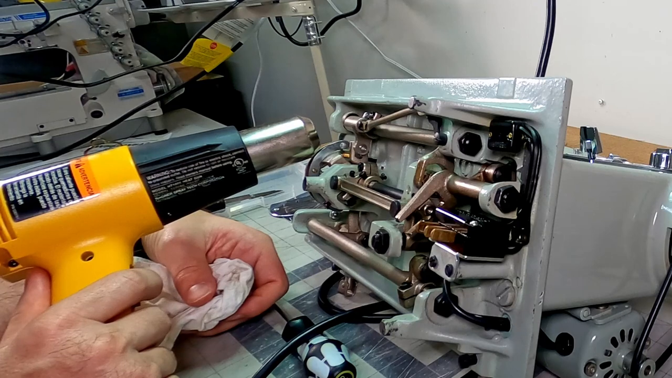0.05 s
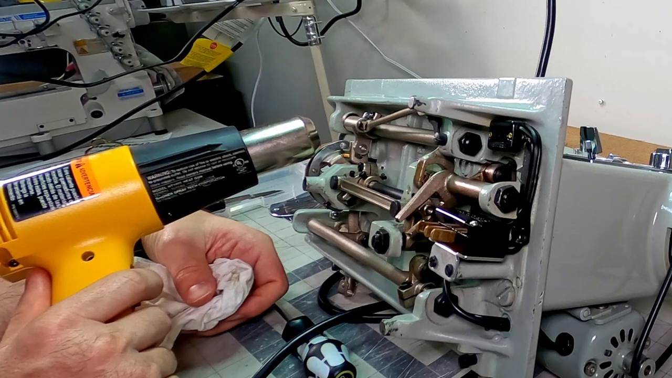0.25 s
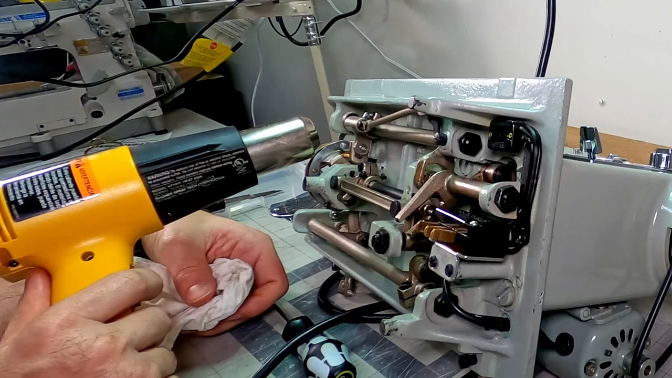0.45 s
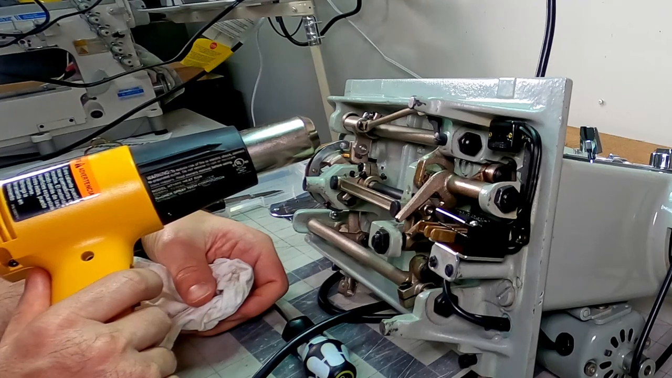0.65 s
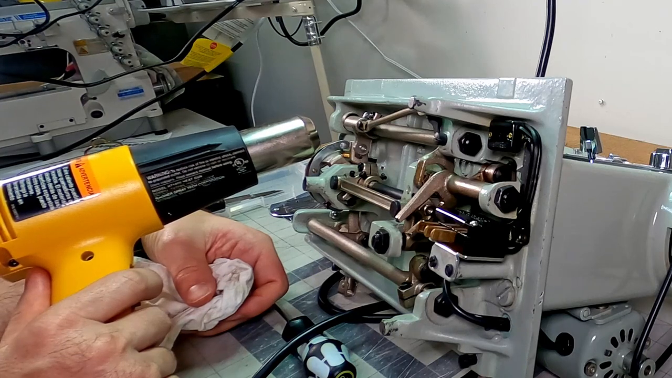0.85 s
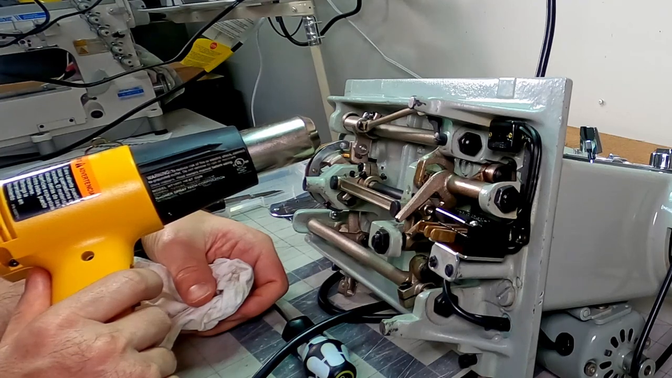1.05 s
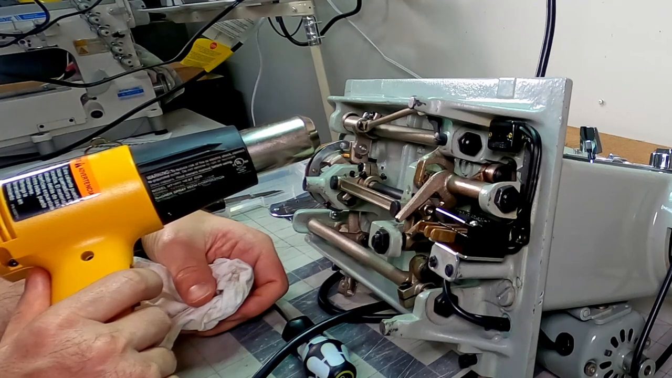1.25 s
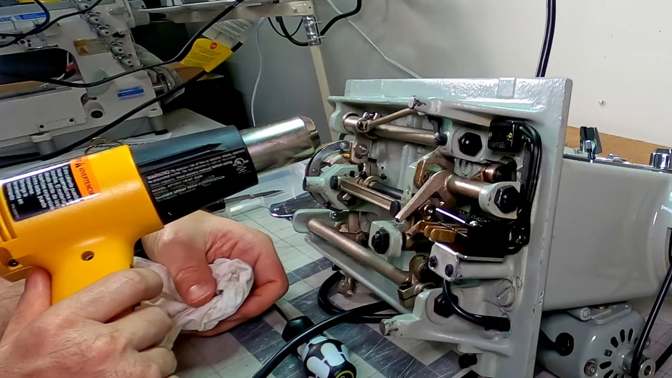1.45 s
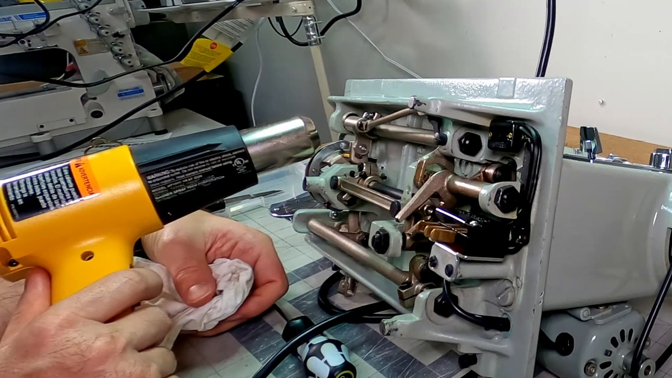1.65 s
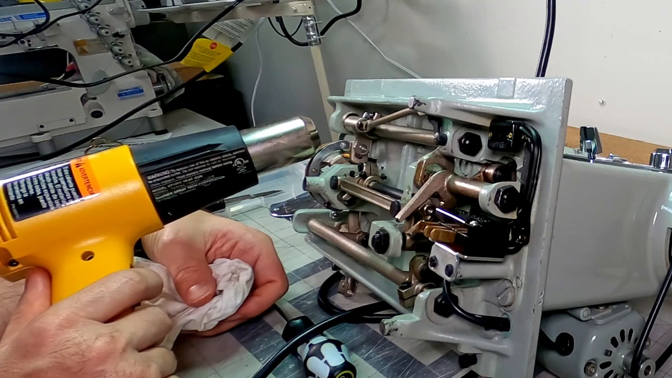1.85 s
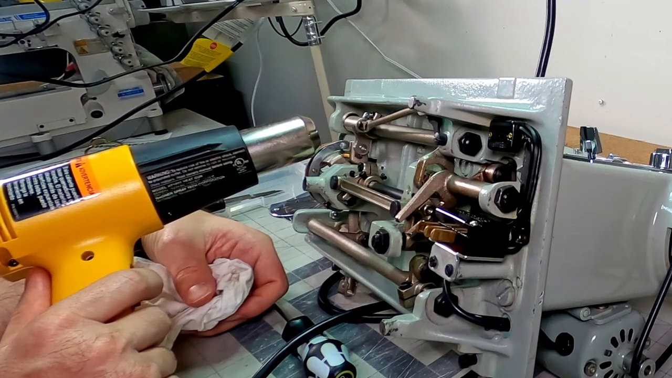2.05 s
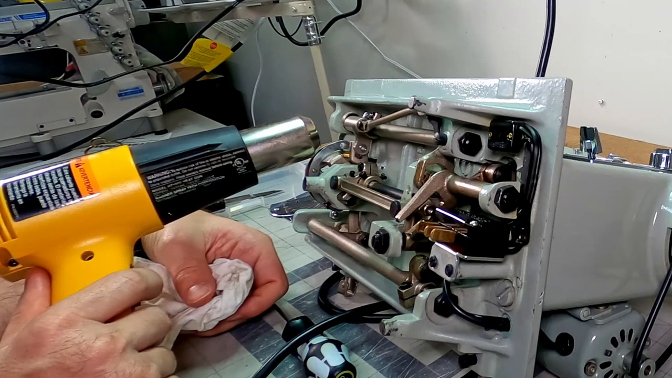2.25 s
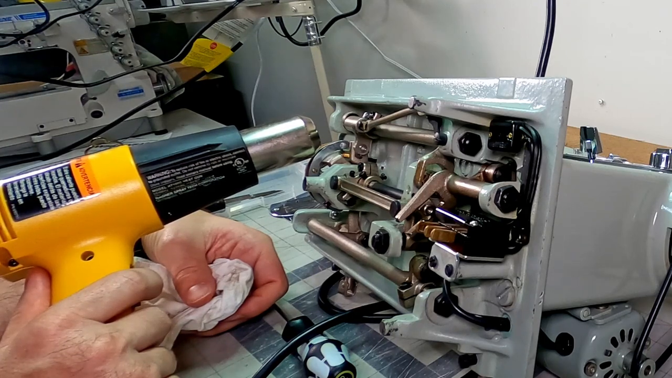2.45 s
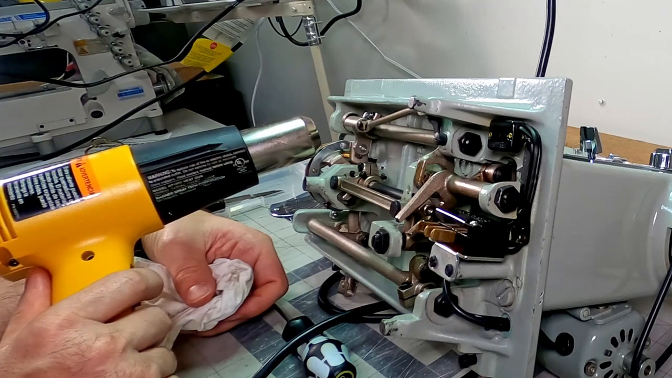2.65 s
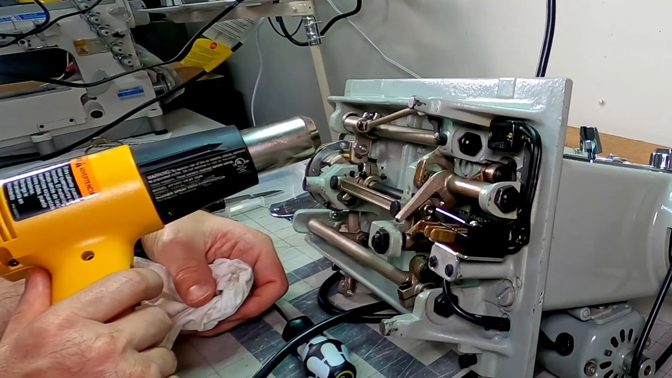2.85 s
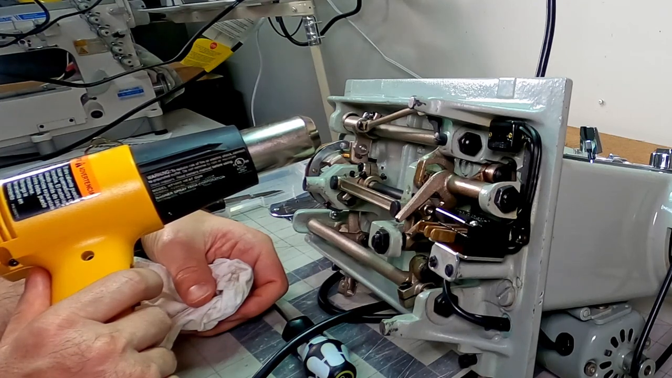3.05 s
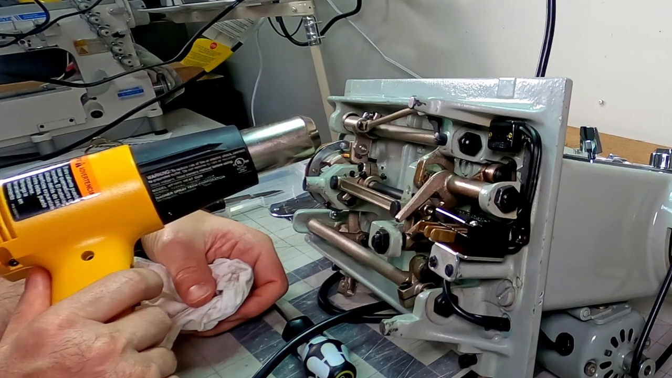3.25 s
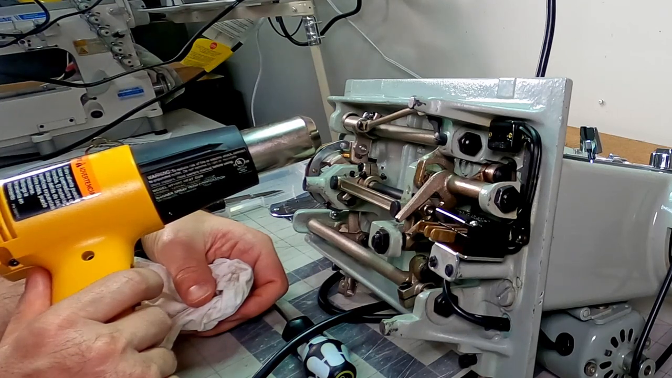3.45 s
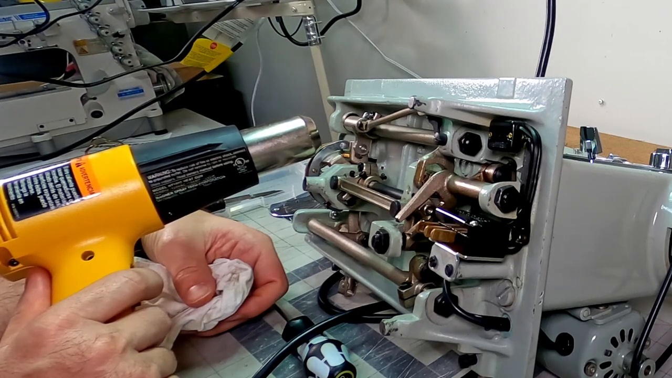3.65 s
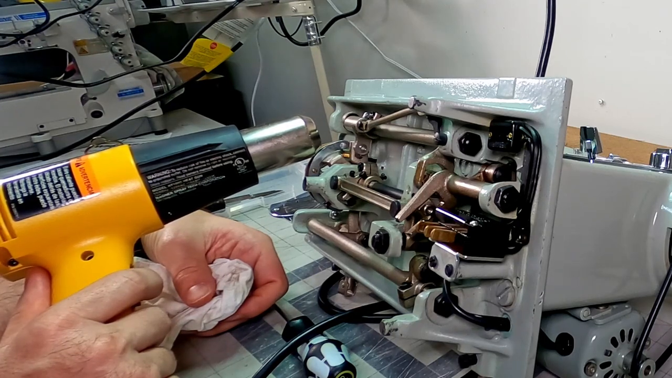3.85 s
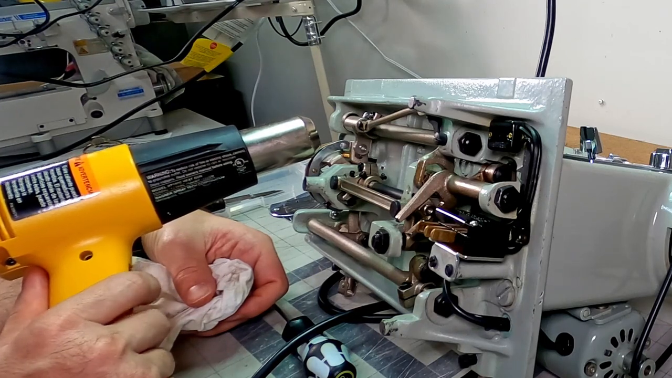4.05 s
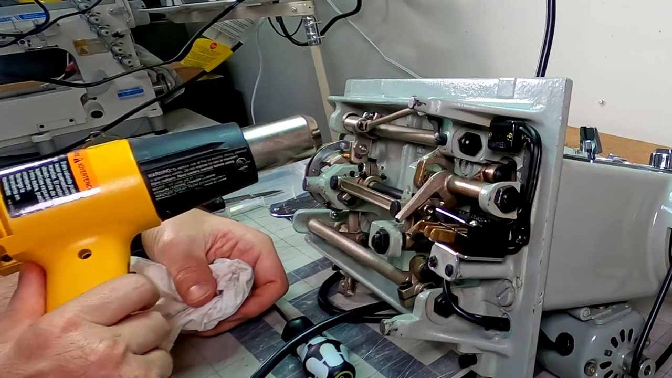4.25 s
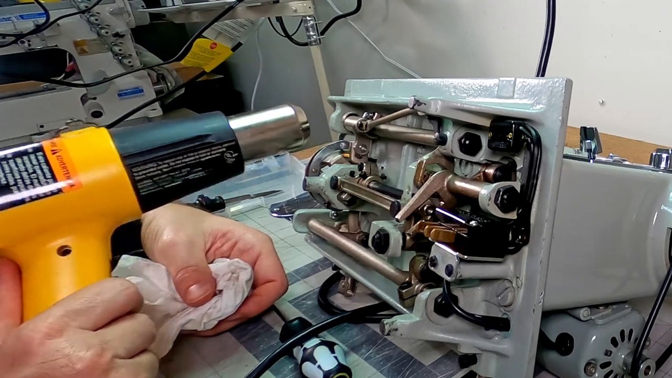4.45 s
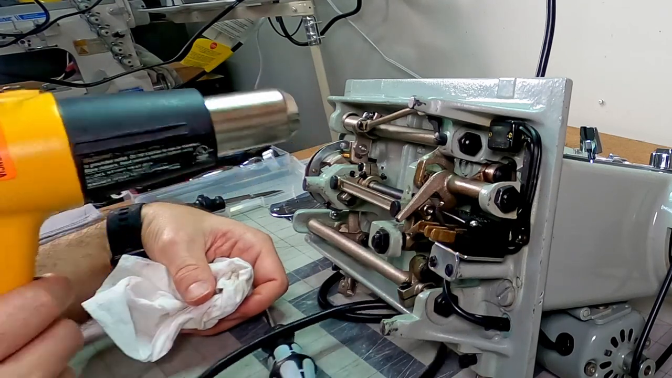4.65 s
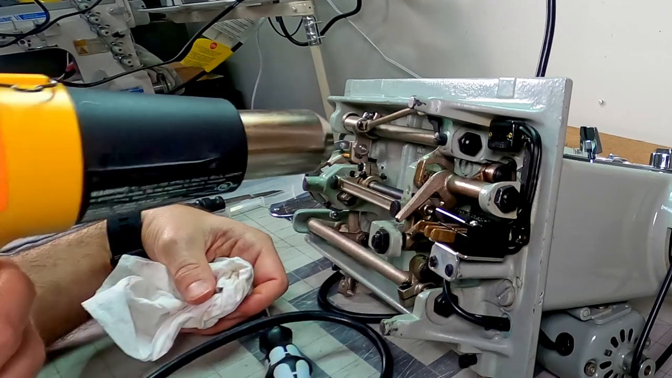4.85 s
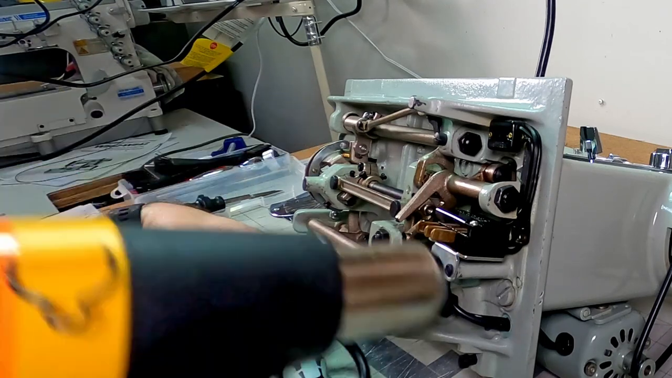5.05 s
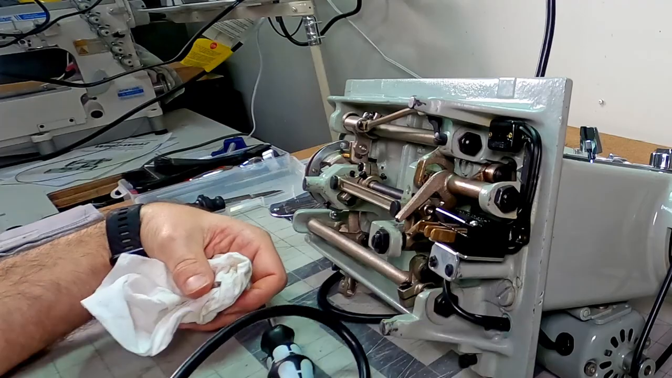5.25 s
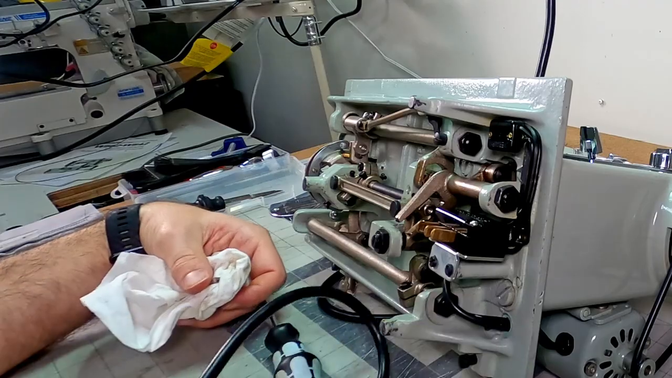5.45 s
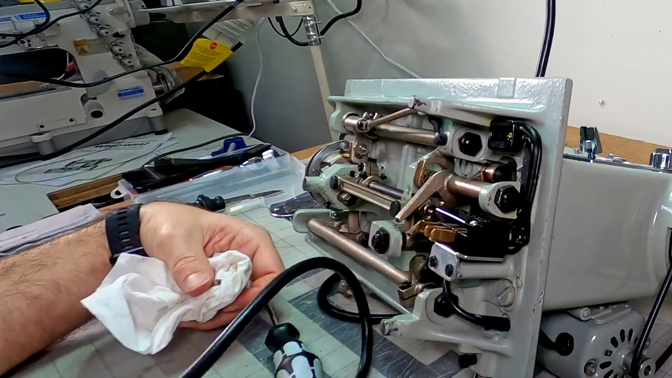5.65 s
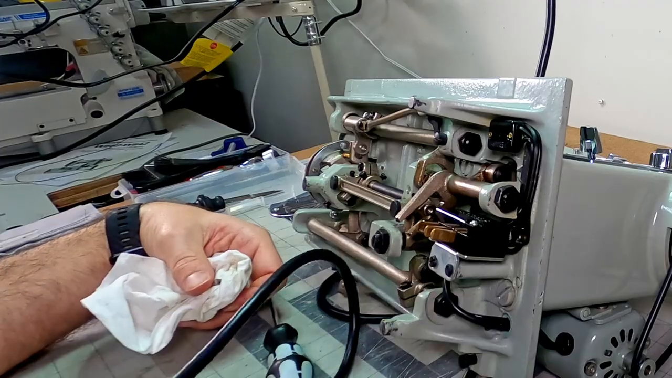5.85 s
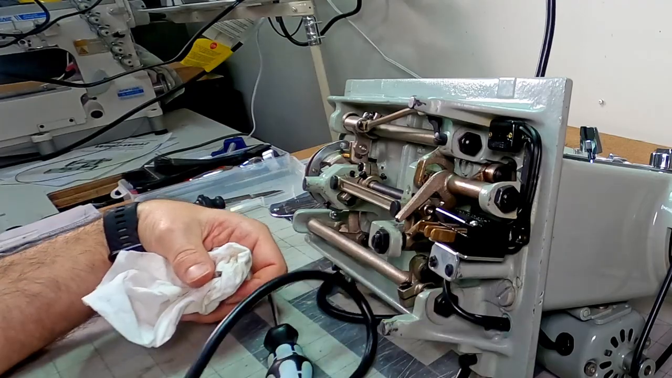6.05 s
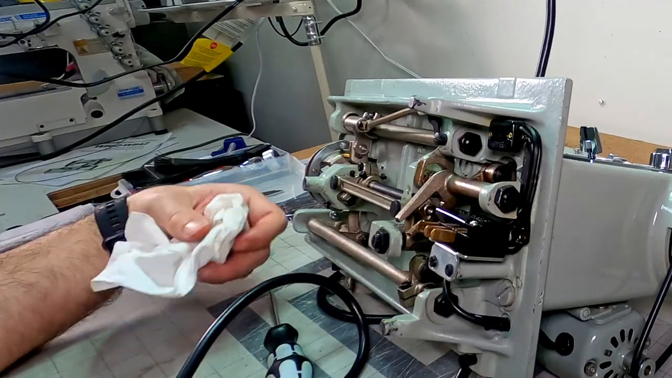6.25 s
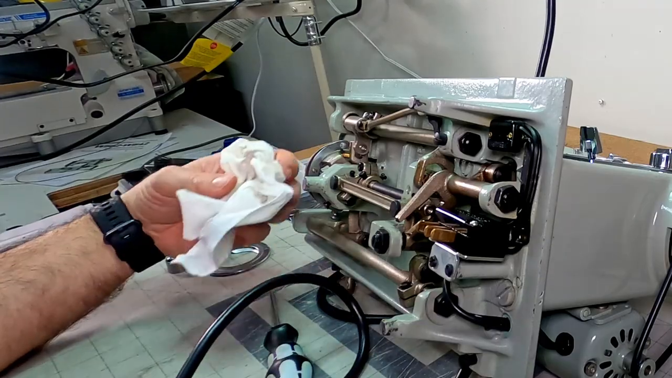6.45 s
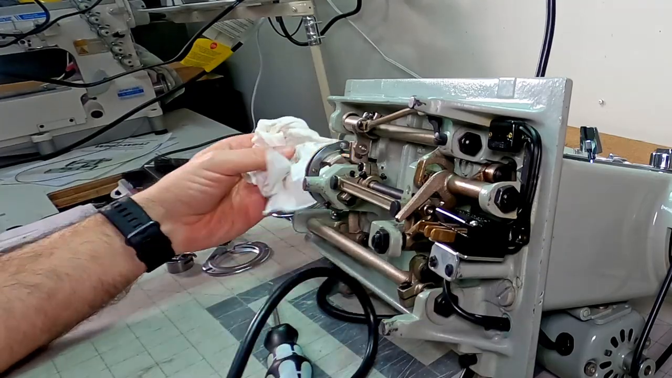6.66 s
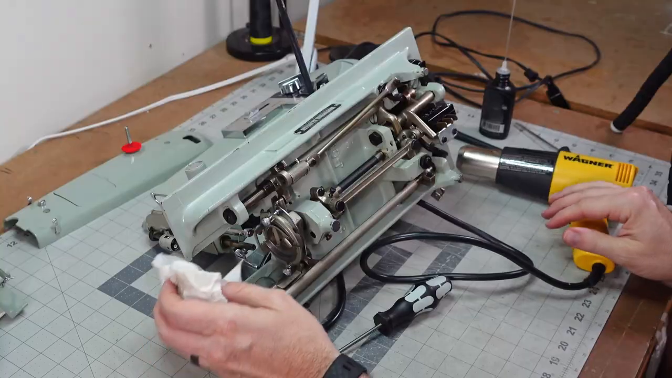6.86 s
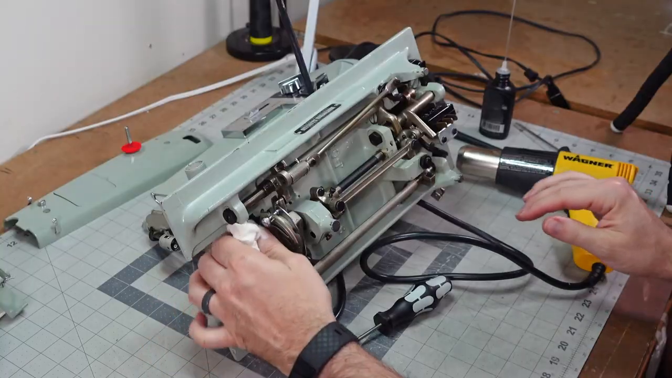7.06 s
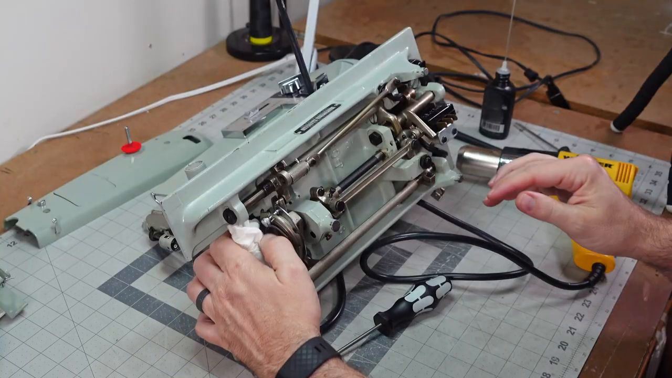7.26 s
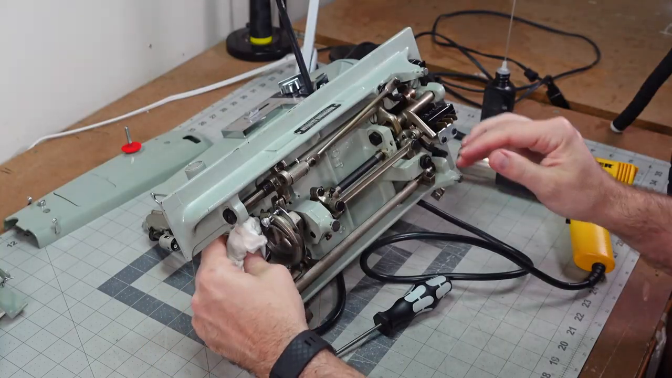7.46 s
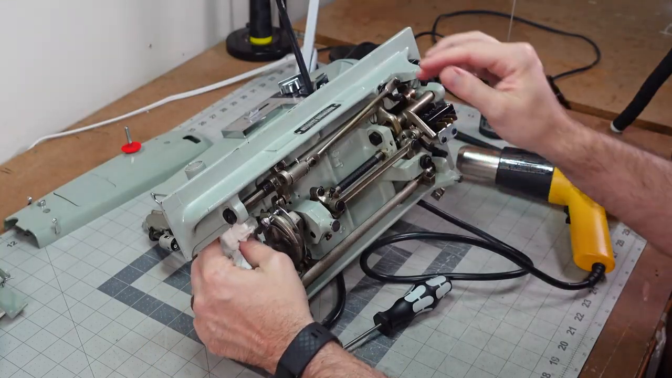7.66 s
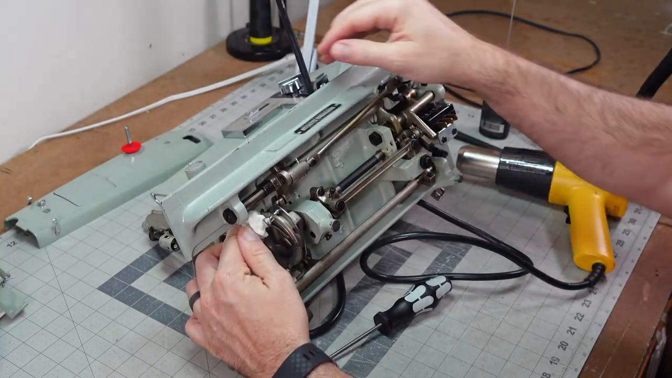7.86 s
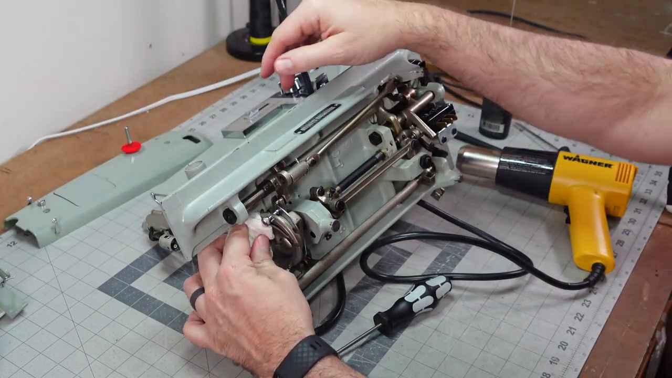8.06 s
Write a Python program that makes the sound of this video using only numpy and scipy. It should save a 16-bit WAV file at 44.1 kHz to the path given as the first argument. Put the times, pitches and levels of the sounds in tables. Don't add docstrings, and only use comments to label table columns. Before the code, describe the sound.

A constant, dense rush of air with an electric fan whine fills the first four seconds, heard close in a fairly dry room. The gun lifts, its pitch jumps and the roar swells, sharp switch clicks cut it and the sound droops away. Small rattles lead to a wooden thump and a harder clattering drop. Then it is quiet: low hum, cloth wiping oily metal, faint high squeaks, light ticks and a last tiny steel ping.

```python
import sys
import numpy as np
from scipy import signal
from scipy.fft import rfft, irfft, next_fast_len
from scipy.io import wavfile
from scipy.ndimage import uniform_filter1d, map_coordinates

SR = 44100
rng = np.random.default_rng(int(sys.argv[2]) if len(sys.argv) > 2 else 0)


def boost_factor(decibels):
    exponent = np.asarray(decibels, float) / 20
    return 10 ** exponent


def dump_mix(stems):
    frames = np.atleast_2d(stems).T
    limited = np.clip(frames, -1, 1)
    pcm = np.round(limited * 32767).astype(np.int16)
    wavfile.write(sys.argv[1], SR, pcm)


N = 358088
T = np.arange(N) / SR

# [f/Hz, density/dB]
HELD_COLOUR = [(300, -21.5), (480, -15.5), (580, -0.5), (850, 1), (1500, -12.5), (1900, -5.5), (2250, -16),
               (4600, -25), (6400, -25), (7300, -24), (9900, -35), (12200, -26.5), (13400, -37),
               (15700, -33)]
# [f/Hz, width/Hz, gain/dB]
BARREL_MODES = [(940.0, 60, -6.6), (1580.0, 60, -3.7), (2160.0, 60, -3.6), (2520.0, 100, 6.1),
                (3360.0, 60, -3.8), (3590.0, 100, -4.1), (3970.0, 160, 4.1), (4750.0, 60, -7.4),
                (4970.0, 60, -3.9), (5100.0, 100, -5.4), (5260.0, 60, 5.1), (6400.0, 100, -9.4),
                (6490.0, 60, -3.8), (6850.0, 100, 9.5), (6980.0, 60, 3.0), (7720.0, 60, 6.1),
                (8140.0, 60, -5.9), (8270.0, 60, 7.5), (8820.0, 100, 3.1), (9210.0, 250, 3.6),
                (9460.0, 60, 7.8), (9920.0, 100, -3.1), (10270.0, 100, 7.1), (11180.0, 160, -5.9),
                (11690.0, 100, 8.7), (12080.0, 60, -5.5), (14080.0, 160, 3.7), (15630.0, 100, 4.6)]
# [f/Hz, level/dB]
HOUSING_MODES = [(2727, -76), (2896, -75), (3133, -77), (3246, -76), (3957, -77), (4177, -78), (4578, -78),
                 (4700, -81), (5039, -81), (5499, -81), (5623, -79), (5908, -79), (8393, -83), (11348, -83),
                 (4522, -78), (4807, -80), (4861, -77), (5152, -80), (5222, -77), (5281, -75), (5685, -78),
                 (5792, -77), (6019, -79), (6164, -78), (6541, -79), (6713, -75), (6837, -69), (7009, -73),
                 (7197, -74), (7434, -78), (7472, -79), (7585, -78), (7720, -77), (8043, -80), (8280, -79),
                 (8640, -81), (9340, -83), (9442, -82), (10309, -84), (10659, -86), (11719, -78),
                 (12177, -82), (15638, -87)]
SHAFT_HZ = 173.92
HELD_DB = -42.5
SAG_S, SAG_TAKES_S, SAG = 4.97, .09, .27


def unit(x):
    return x / np.sqrt(np.mean(x ** 2) + 1e-20)


def peak(x):
    return x / np.abs(x).max()


def ramp(start_s, takes_s):
    return np.clip((T - start_s) / takes_s, 0, 1)


def along(points, hz):
    f, v = np.transpose(points)
    return np.interp(np.log(hz + 1), np.log(f + 1), v)


def curve(rows):
    s, v = np.transpose(rows)
    return np.interp(T, s, v)


def wobble(rate):
    return map_coordinates(rng.standard_normal(int(N * rate / SR) + 4), [np.arange(N) * rate / SR])


def filtered(x, response):
    m = next_fast_len(len(x) + 8192)
    return irfft(rfft(x, m) * response(np.fft.rfftfreq(m, 1 / SR)), m)[:len(x)]


def treble_of(x, corner_hz, order):
    return filtered(x, lambda hz: 1 / (1 + (corner_hz / (hz + 1)) ** order))


def resonance(f, hz, width):
    return 1j * f * width / (hz * hz - f * f + 1j * f * width)


def bumps(modes, hz):
    return sum(db * np.abs(resonance(hz, c, w)) ** 2 for c, w, db in modes)


def rush(colour_db, patchy_db, high=6, long=12):
    z = signal.stft(rng.standard_normal(N), nperseg=512)[2]
    field = uniform_filter1d(rng.standard_normal(z.shape), size=high, axis=0)
    field = uniform_filter1d(field, size=long, axis=1)
    noise = signal.istft(z * boost_factor(patchy_db * unit(field)), nperseg=512)[1][:N]
    return unit(filtered(noise, lambda hz: boost_factor(colour_db(hz))))


def breath(width_hz):
    return unit(filtered(rng.standard_normal(N), lambda hz: 1 / (1 + (2 * hz / width_hz) ** 2)))


def lift():
    # [t/s, shaft speed ratio]
    speed_points = [
        (0, 1),
        (4.42, 1),
        (4.64, 1.33),
        (4.8, 1.33),
        (4.97, 1.3),
        (5.07, 1.07),
        (5.2, .85),
        (5.6, .4),
    ]
    # [t/s, level/dB]
    sweep = [(4.1, -63), (4.3, -54), (4.42, -44), (4.54, -38), (4.74, -35.5), (4.87, -38), (4.97, -44.5),
             (5.05, -49), (5.11, -54), (5.2, -62), (5.6, -91)]
    speed, free_db = curve(speed_points), curve(sweep)
    fading = boost_factor(np.maximum(HELD_DB - 92 * np.clip(T - 4.26, 0, None) ** 2, -150))
    held_db = 20 * np.log10(fading + boost_factor(free_db - 15.5))
    lift_db = -2 + 33 * np.clip(T - 4.93, 0, .4)
    detour_m = .5 + .7 * (speed - 1).clip(-.15)
    return held_db, free_db, lift_db, speed, detour_m


def held_jet():
    scatter = rng.standard_normal(900)

    def colour_db(hz):
        ripple = 3 * np.interp(hz, np.linspace(0, SR / 2, len(scatter)), scatter)
        ripple = ripple * np.clip(hz / 3000 - .2, 0, 1)
        return along(HELD_COLOUR, hz) + bumps(BARREL_MODES, hz) + ripple

    def modes(f):
        return sum(boost_factor(db) * resonance(f, hz, 3.8) / np.sqrt(np.pi * 22 / SR) for hz, db in HOUSING_MODES)

    return rush(colour_db, patchy_db=0.35) + boost_factor(38) * filtered(rng.standard_normal(N), modes)


def free_jet(lift_db, detour_m):
    # [f/Hz, density/dB]
    free_colour = [(180, -22), (300, -7), (384, -21.5), (543, -7), (769, 0.5), (937, -9), (1300, -4.5),
                   (1560, -14.5), (2560, -13), (3020, -22.5), (3810, -19), (7500, -21), (12000, -34.5),
                   (15500, -27)]
    # [f/Hz, width/Hz, gain/dB]
    nozzle = [(577, 94, 3.5), (777, 37, 9.5), (1050, 50, 7), (2080, 120, 3), (2580, 130, 2), (3700, 220, 8),
              (7100, 570, 5), (11300, 450, 11)]
    jet = rush(lambda hz: along(free_colour, hz) + bumps(nozzle, hz), patchy_db=3.5, high=1, long=24)
    jet = jet + .55 * map_coordinates(jet, [np.arange(N) - detour_m / 343 * SR])
    turning = 1 + .035 * ramp(4.8, .09)
    sagging = turning - SAG * ramp(SAG_S, SAG_TAKES_S)
    roar = filtered(jet, lambda hz: 1 / (1 + (hz / 950) ** 6))
    upper = map_coordinates(jet - roar, [np.cumsum(turning)], mode="wrap")
    jet = upper + map_coordinates(roar, [np.cumsum(sagging)], mode="wrap")

    def facing_bands(hz):
        return np.abs(resonance(hz, 1220, 280)) ** 2 + 0.69 * np.abs(resonance(hz, 2450, 300)) ** 2

    facing = boost_factor(5 * np.exp(-((T - 4.7) / 0.13) ** 4))
    jet = jet + (facing - 1) * filtered(jet, facing_bands)
    middle = filtered(jet, lambda hz: np.abs(resonance(hz, 2700, 2200)) ** 2)
    treble = treble_of(jet, 5500, 4)
    return jet + (boost_factor(lift_db) - 1) * treble + (boost_factor(-.6 * lift_db) - 1) * middle


def whine(shaft, held_db, free_db, lift_db):
    orders = [1, 3, 5, 6, 7, 11, 12, 15, 17, 19, 20, 28]
    # [under held jet/dB, under free jet/dB]
    tone_levels = [(-37, -29), (-23.5, -14.5), (-10.5, -24), (-17, -16.5), (-20.5, -37), (-12.5, -30),
                   (-21.5, -41), (-18, -46), (-45, -31), (-50, -34), (-29.5, -43), (-50, -50)]
    out = np.zeros(N)
    for k, (a_db, b_db) in zip(orders, tone_levels):
        level = boost_factor(held_db + a_db) + boost_factor(free_db + b_db + 0.85 * lift_db)
        tone = boost_factor(0.69 * wobble(8)) * np.sin(k * shaft + 2 * np.pi * rng.random())
        out += np.sqrt(2) * level * tone
    return out


def housing(shaft):
    m = next_fast_len(N + SR)
    orders = np.add.outer(np.arange(16, 88), [0, .32, .62]).ravel()
    faint_hz = SHAFT_HZ * orders
    faint_db = HELD_DB - 22.5 + 2.8 * np.log2(orders / 30)
    faint_db = faint_db + along(HELD_COLOUR, faint_hz) + bumps(BARREL_MODES, faint_hz)
    faint_db = faint_db + 14 * rng.standard_normal(len(orders)).clip(None, .55)
    hz, db = np.hstack([np.transpose(HOUSING_MODES), [faint_hz, faint_db]])
    lines = np.zeros(m // 2 + 1, complex)
    phases = np.exp(2j * np.pi * rng.random(len(hz)))
    lines[np.round(hz / SR * m).astype(int)] = boost_factor(db) * phases * m / np.sqrt(2)
    return map_coordinates(irfft(lines, m), [shaft / (2 * np.pi * SHAFT_HZ) * SR], mode="wrap")


def gun():
    held_db, free_db, lift_db, speed, detour_m = lift()
    unsteady = 1 + 0.000398 * wobble(2.143) + 0.000907 * wobble(40)
    shaft = 2 * np.pi * SHAFT_HZ * np.cumsum(speed * unsteady) / SR
    air = boost_factor(held_db + 0.37 * wobble(6.32)) * held_jet()
    air = air + boost_factor(free_db - 1.76) * free_jet(lift_db, detour_m)
    throb = 0.19 * np.sin(shaft) + 0.053 * np.sin(2 * shaft) + 0.065 * np.sin(3 * shaft)
    chopped = throb * treble_of(air, 2500, 4)
    sing_level = (boost_factor(held_db + 46.5) + boost_factor(free_db + 19)) * boost_factor(-22 * np.abs(speed - 1))
    return air + chopped + whine(shaft, held_db, free_db, lift_db) + sing_level * housing(shaft)


def edge():
    held_db, free_db, *_ = lift()
    aim_hz = 6950 + 75 * wobble(3.0)
    drifting = breath(110) * np.sin(2 * np.pi * np.cumsum(aim_hz) / SR)
    upper = boost_factor(4 * wobble(3)) * breath(220) * np.sin(2 * np.pi * 11700 * T)
    hoot_hz = 815 * (1 - SAG * ramp(SAG_S, SAG_TAKES_S))
    hoot = ramp(4.85, 0.11) * breath(52) * np.sin(2 * np.pi * np.cumsum(hoot_hz) / SR)
    return boost_factor(held_db) * (boost_factor(-33) * drifting + boost_factor(-36) * upper) + boost_factor(free_db - 5.5) * hoot


def shop():
    # [f/Hz, level/dB]
    hum_tones = [(56, -66), (113.5, -64.5), (175, -69.5), (226, -64), (333, -75), (399, -69.5)]
    # [f/Hz, density/dB]
    vent_colour = [(30, -24), (48, -52), (62, -1.5), (82, -33), (110, -2.5), (170, -10), (270, -9),
                   (335, -6.5), (480, -13), (680, -12), (1100, -7), (1500, -17), (2900, -26),
                   (15500, -43.5)]
    hum = np.zeros(N)
    for hz, db in hum_tones:
        level = np.sqrt(2) * boost_factor(db + hz / 150 * wobble(4.6))
        hum += level * np.sin(2 * np.pi * hz * T + hz / 300 * wobble(4))
    return hum + boost_factor(-52 + 0.74 * wobble(2.08)) * rush(lambda hz: along(vent_colour, hz), patchy_db=1.4)


def rag():
    # [f/Hz, density/dB]
    cloth_colour = [(200, -44), (700, 9.5), (1200, 1.5), (1800, 0), (2500, -2.5), (3200, -8), (5000, -11.5),
                    (9000, -18.5), (12000, -20), (15500, -18)]
    # [t/s of the peak, rise/s, fall/s, level/dB, brightness: treble above 4.5
    # kHz raised 3.57 dB per unit]
    strokes = [
        (5.64, 0.06, 0.077, -59, 0),
        (5.83, 0.072, 0.09, -54.5, 0),
        (6.05, 0.053, 0.06, -68.5, 4),
        (6.36, 0.18, 0.12, -61.5, -10),
        (6.7, 0.1, 0.075, -57.5, 3),
        (6.77, 0.038, 0.023, -59.5, 2),
        (7.02, 0.15, 0.088, -62, 0.5),
        (7.58, .07, 0.11, -68.5, 3),
        (7.78, 0.071, 0.062, -59.5, -0.5),
    ]
    dull = bright = boost_factor(-67) * ramp(3.8, 0.09)
    for s, rise, fall, db, tilt_db in strokes:
        stroke = boost_factor(db) * np.exp(-((T - s) / np.where(T < s, rise, fall)) ** 2)
        dull = np.hypot(dull, stroke)
        bright = np.hypot(bright, boost_factor(3.57 * tilt_db) * stroke)
    cloth = rush(lambda hz: along(cloth_colour, hz), patchy_db=1) * boost_factor(1.3 * wobble(250))
    top = treble_of(cloth, 4500, 2)
    return boost_factor(5.0) * (dull * (cloth - top) + bright * top)


def walls(x):
    # [f/Hz, t60/s]
    room_t60 = [(100, 0.2), (800, 0.27), (4000, 0.22), (15000, 0.14)]
    hz, t, z = signal.stft(rng.standard_normal(len(x)), SR, nperseg=256)
    tail = signal.istft(z * boost_factor(-60 * t / along(room_t60, hz)[:, None]), SR, nperseg=256)[1]
    return signal.fftconvolve(np.pad(x, (150, 0)), tail / np.linalg.norm(tail))[:len(x)]


def strike(contacts, crack_db, rise_db, thud_db, wet_db):
    # [f/Hz, width/Hz, level/dB]
    bench_modes = [(85, 10, 6.5), (159, 28, -17), (222, 17, -2.5), (347, 150, -1.5), (534, 78, 1.5),
                   (750, 54, 1.5)]

    def wood(f):
        return sum((-1) ** k * boost_factor(db) * resonance(f, c, w) for k, (c, w, db) in enumerate(bench_modes))

    out, t = np.zeros(N + SR), np.arange(SR // 3) / SR
    for s, db, ring_hz, t60 in contacts:
        decay = boost_factor(-60 * t / np.clip(t60, .004, .2)) * (1 - np.exp(-t / 0.0001))
        burst = rng.standard_normal((3, len(t))) * decay
        burst[:, 6] += 2.5
        ring = filtered(burst[0], lambda f: resonance(f, ring_hz, .19 * ring_hz))
        crack = filtered(burst[1], lambda f: resonance(f, 0.79 * ring_hz, 1.54 * ring_hz) ** 2)
        crack_level = boost_factor(crack_db + rise_db * np.log2(ring_hz / 3000))
        hit = peak(peak(ring) + crack_level * peak(crack))
        hit = hit + boost_factor(thud_db) * peak(filtered(burst[2], wood))
        out[round(s * SR):][:len(t)] += boost_factor(db - 0.5) * (hit + boost_factor(wet_db) * walls(hit))
    return out[:N]


def switch():
    # [t/s, peak/dB, ring f/Hz, t60/s]
    clicks = [(4.369, -34, 5000, .035), (4.382, -45, 11500, .02), (4.404, -30, 5100, .011),
              (4.4042, -26, 3600, 0.013), (4.4045, -27, 11000, .015), (4.4274, -22, 2060, 0.027),
              (4.7857, -19, 5200, .023), (4.7933, -12, 7250, 0.01), (4.7947, -21.5, 2180, 0.04),
              (4.8544, -26, 6960, 0.03), (4.8546, -26, 3700, 0.013), (4.7936, -18.5, 3980, .012),
              (4.794, -38, 1460, 0.013), (4.868, -32, 7400, 0.016)]
    return strike(clicks, crack_db=0, rise_db=0.1, thud_db=-41, wet_db=-9)


def ticks():
    # [t/s, peak/dB, ring f/Hz, t60/s]
    small_parts = [(5.2774, -48, 4200, .02), (5.4435, -41.5, 12600, .02), (5.5405, -39, 2300, 0.011),
                   (5.602, -52, 6000, .01), (5.7199, -46, 4960, 0.019), (6.5405, -33, 2650, 0.013),
                   (6.541, -45, 4570, .049), (6.542, -39, 750, .035), (6.5415, -52, 7500, .05),
                   (6.563, -44, 2800, .01), (6.542, -33.5, 13600, 0.013), (6.6147, -50, 2270, .015),
                   (6.6491, -44, 2480, .015), (6.675, -39, 2480, .02), (6.69, -40, 5000, .015),
                   (5.6315, -34.5, 11800, 0.021), (5.4445, -44, 2500, 0.009), (5.721, -46, 11500, .015),
                   (6.777, -44, 2500, .011), (7.642, -59, 10800, .03), (7.781, -51, 10600, .02),
                   (8.1037, -36, 13100, .022)]
    return strike(small_parts, crack_db=-10, rise_db=4.7, thud_db=-28, wet_db=-6)


def laying():
    # [t/s, peak/dB, ring f/Hz, t60/s]
    touches = [(5.632, -37, 2020, 0.032), (5.769, -38, 4740, 0.012), (5.7712, -32, 960, .006),
               (5.7938, -24.5, 2120, 0.019), (5.7975, -28.5, 2260, 0.021), (5.8025, -25.5, 2070, 0.016),
               (5.802, -28, 4870, 0.01), (5.8166, -26.5, 2730, 0.014), (5.8168, -39, 4140, 0.014),
               (5.82, -27.5, 1280, 0.039), (5.842, -41, 10100, .011), (5.8599, -31.5, 1690, 0.026),
               (5.8597, -36, 3600, 0.0091), (5.633, -43, 800, 0.027), (7.1054, -39, 980, 0.054),
               (7.639, -42, 2200, .015)]
    return strike(touches, crack_db=-3.5, rise_db=4.3, thud_db=-7, wet_db=-8)


def squeaks():
    # [t/s, length/s, from f/Hz, to f/Hz, level/dB]
    whistles = [(5.635, 0.023, 12200, 11000, -68), (5.822, .025, 11200, 12000, -62),
                (6.78, 0.1, 10500, 11600, -68), (6.85, 0.049, 11600, 11300, -69),
                (6.83, .07, 12500, 12350, -79), (6.88, 0.081, 12150, 11400, -74),
                (6.95, .05, 12050, 11850, -76), (6.89, .08, 10300, 10400, -78),
                (6.9, .07, 10750, 10950, -75), (6.965, 0.048, 10850, 10800, -69),
                (6.995, .055, 10800, 10200, -72), (7.015, .035, 11750, 11400, -77),
                (7.06, .075, 11300, 11750, -75), (7.065, .045, 10300, 10550, -77),
                (7.1, .045, 10950, 10450, -69), (7.145, .125, 10550, 10450, -78),
                (7.15, .1, 10100, 10000, -83)]
    out = np.zeros(N)
    waver_hz, flutter = 60 * wobble(70), boost_factor(4 * wobble(90))
    for s, length, from_hz, to_hz, db in whistles:
        span = slice(round(s * SR), round((s + length) * SR))
        u = (T[span] - s) / length
        hz = from_hz + (to_hz - from_hz) * u + waver_hz[span]
        swell = np.sqrt(np.abs(np.sin(np.pi * u)))
        out[span] += boost_factor(db + 1.5) * swell * np.sin(2 * np.pi * np.cumsum(hz) / SR)
    return out * flutter


def knocks():
    # [f/Hz, level/dB, t60/s]
    body_modes = [(94.4, -21, 0.35), (233, -9, 0.1), (328, -4.5, 0.13), (480, -10, 0.053), (600, 3, 0.085),
                  (800, -7.5, 0.11), (980, -10, 0.063), (1185, -10, 0.04), (1500, -10, 0.062)]
    # [t/s, level/dB, pitch ratio]
    landings = [
        (5.819, -31.5, .79),
        (6.129, -26, 1.01),
    ]
    out, t = np.zeros(N + SR), np.arange(SR // 3) / SR
    for s, level_db, ratio in landings:
        drift = 0.051 * np.cumsum(rng.standard_normal((len(body_modes), len(t))), axis=1)
        body = np.zeros(len(t))
        for (hz, db, t60), phase in zip(body_modes, drift):
            body += boost_factor(db - 60 * t / t60) * np.sin(2 * np.pi * hz * ratio * t + phase)
        body = body * (1 - np.exp(-t / 0.0039))
        out[round(s * SR):][:len(t)] += boost_factor(level_db) * (body + boost_factor(-8.5) * walls(body))
    return out[:N]


def slam():
    # [t/s, peak/dB, ring f/Hz, t60/s]
    drop_contacts = [
        (6.129, -17, 4720, 0.0072),
        (6.1292, -25.5, 2300, 0.084),
        (6.1295, -27, 8500, .04),
        (6.13, -28, 1490, 0.089),
        (6.1306, -21, 5500, 0.014),
    ]
    return strike(drop_contacts, crack_db=13, rise_db=2.1, thud_db=-13, wet_db=-7)


def steel():
    # [f/Hz, level/dB, t60/s]
    ping_modes = [(13100, -37.5, 0.093), (8400, -57, .08), (6540, -62, .06), (11800, -62, .06)]
    out, t = np.zeros(N + SR), np.arange(SR // 3) / SR
    ping = sum(boost_factor(db - 60 * t / t60) * np.sin(2 * np.pi * hz * t) for hz, db, t60 in ping_modes)
    out[round(8.104 * SR):][:len(t)] += ping
    return out[:N]


def scene():
    blowing = gun() + edge() + shop()
    handling = rag() + switch() + ticks() + laying()
    ending = squeaks() + knocks() + slam() + steel()
    return np.tile(blowing + handling + ending, (2, 1))


def band_limit(x):
    return signal.sosfilt(signal.butter(12, 16820, fs=SR, output="sos"), x)


def record(dry):
    top_hz = 15780
    cut = filtered(dry[0], lambda hz: np.where(hz < top_hz, 1, boost_factor(-39) * (hz < top_hz + 130)))
    return band_limit(np.array([cut, cut]))


dry = scene()
out = record(dry)
dump_mix(out)
```